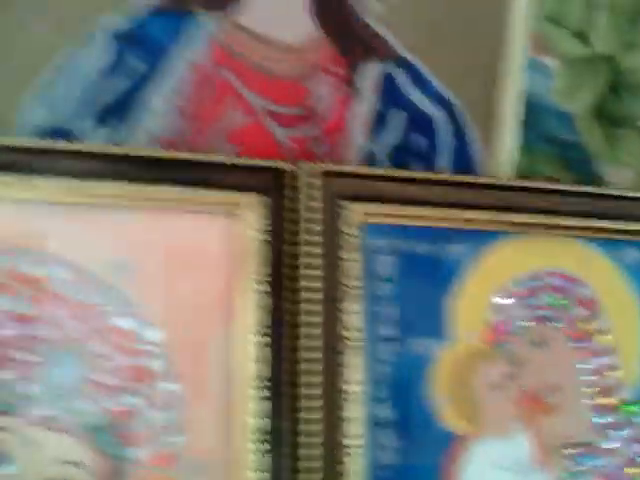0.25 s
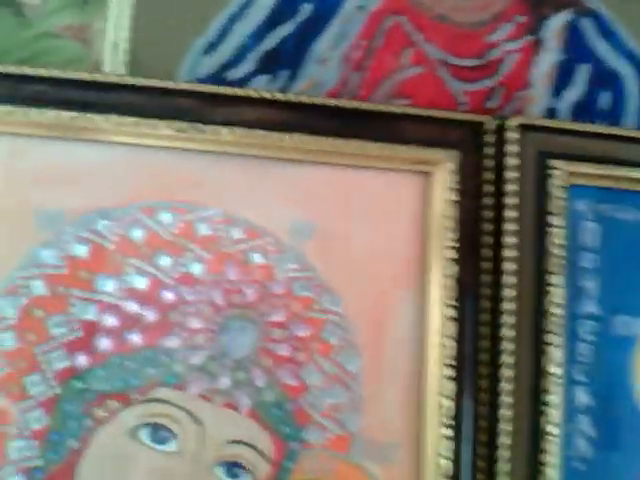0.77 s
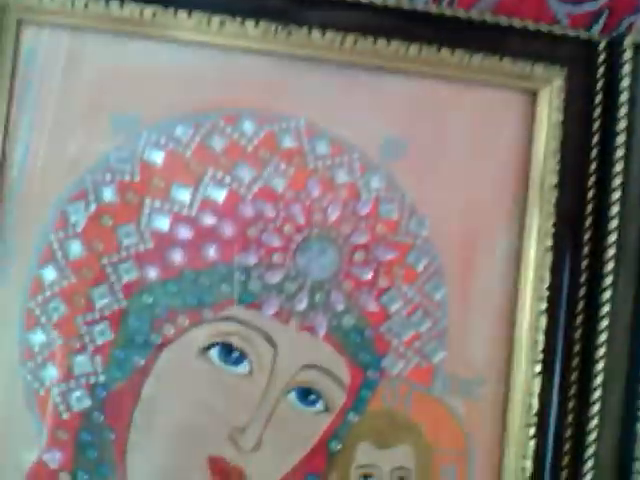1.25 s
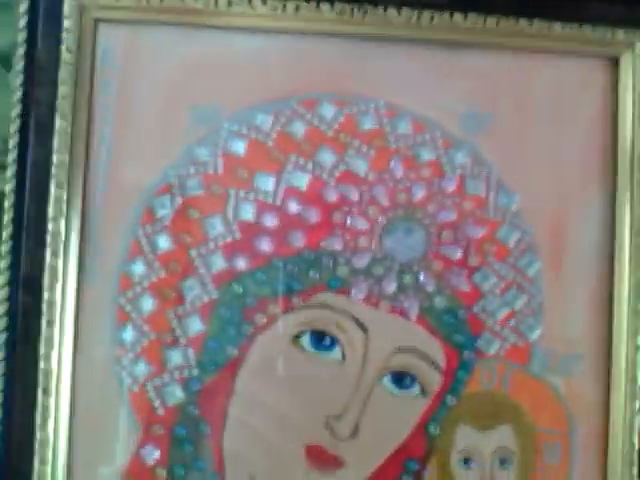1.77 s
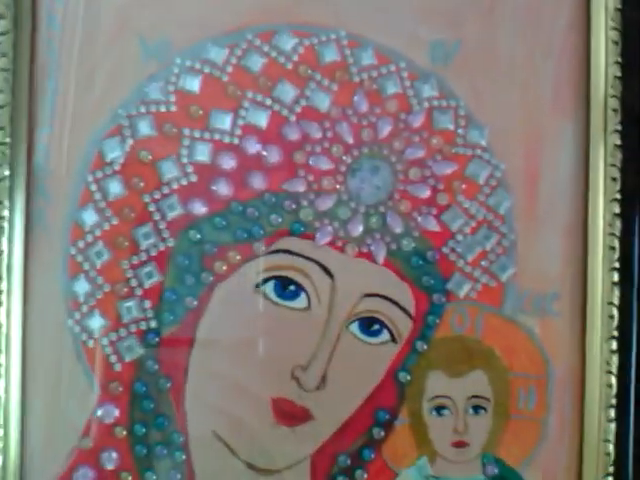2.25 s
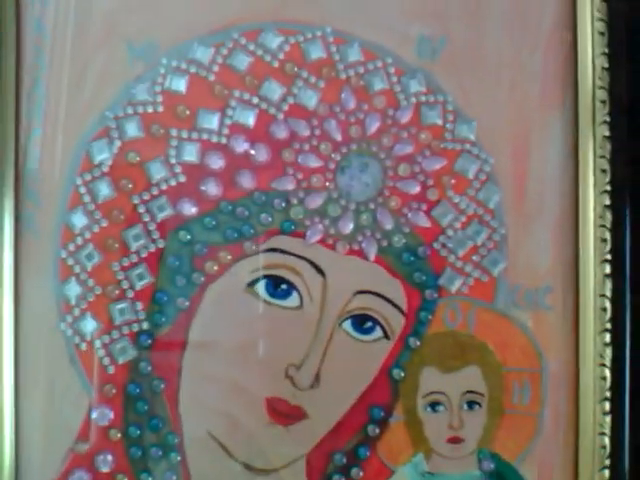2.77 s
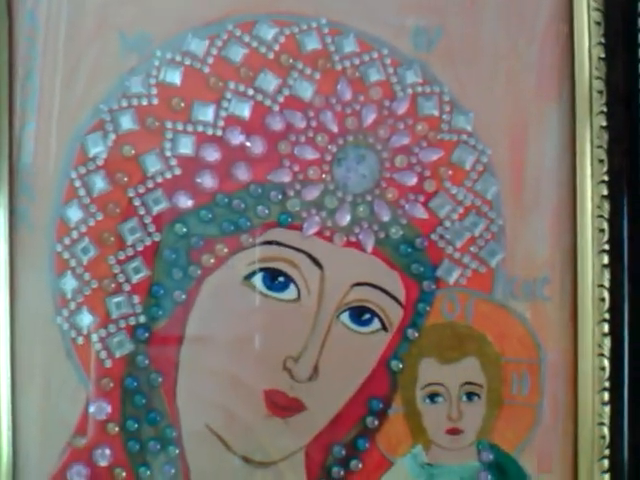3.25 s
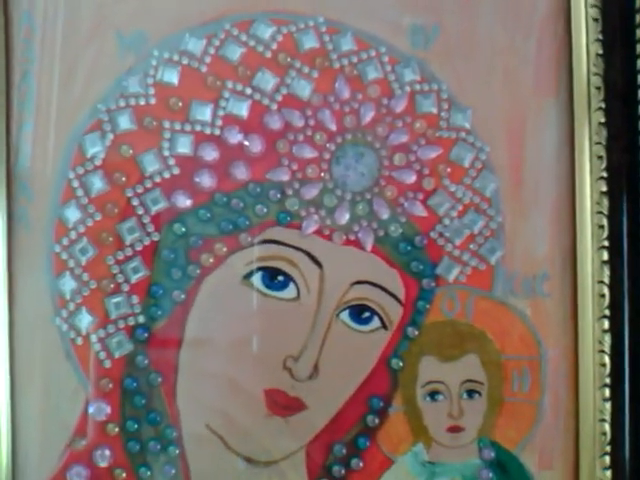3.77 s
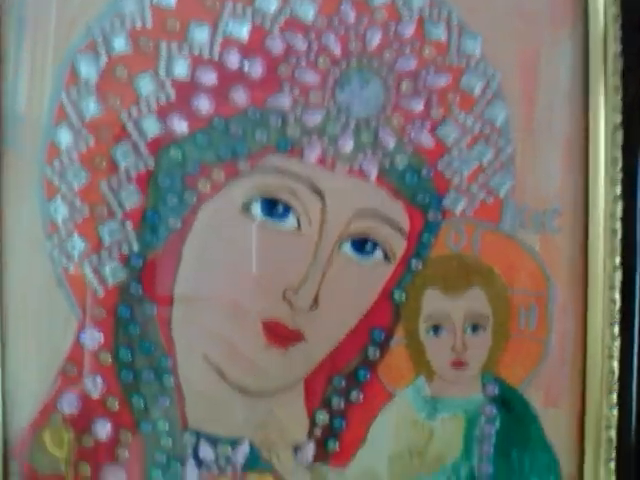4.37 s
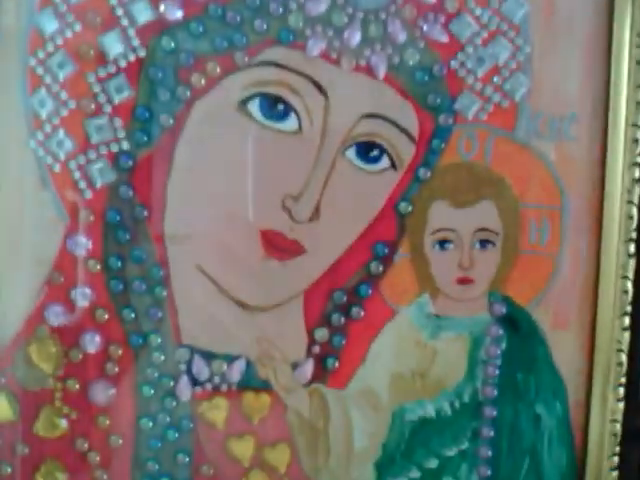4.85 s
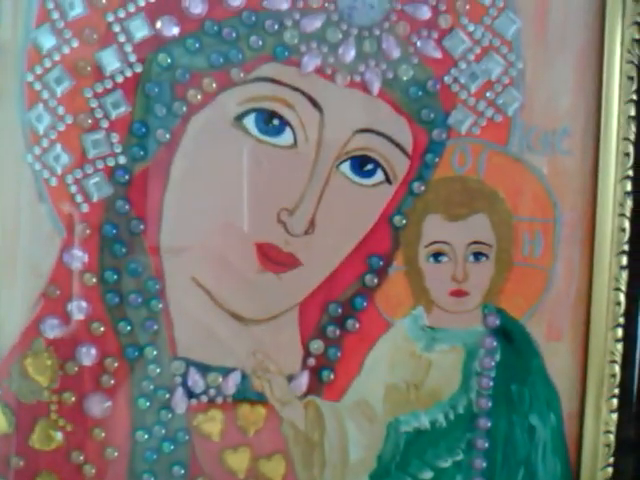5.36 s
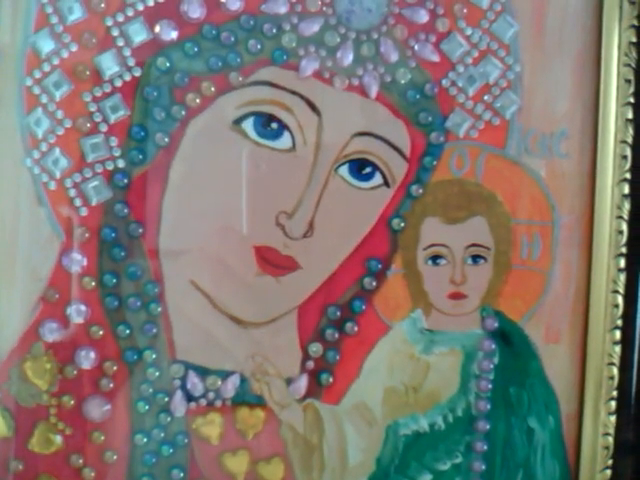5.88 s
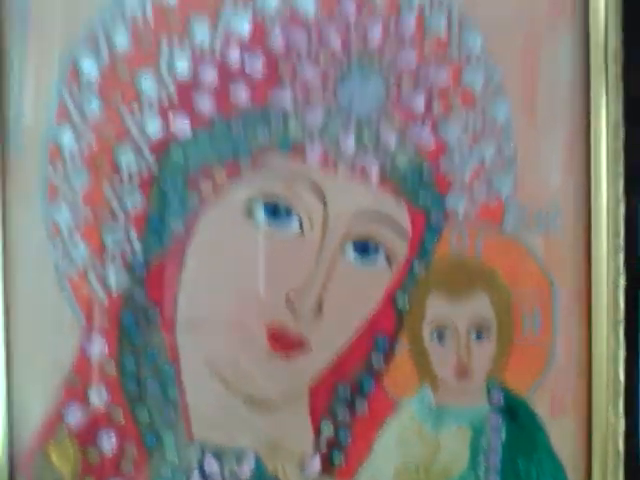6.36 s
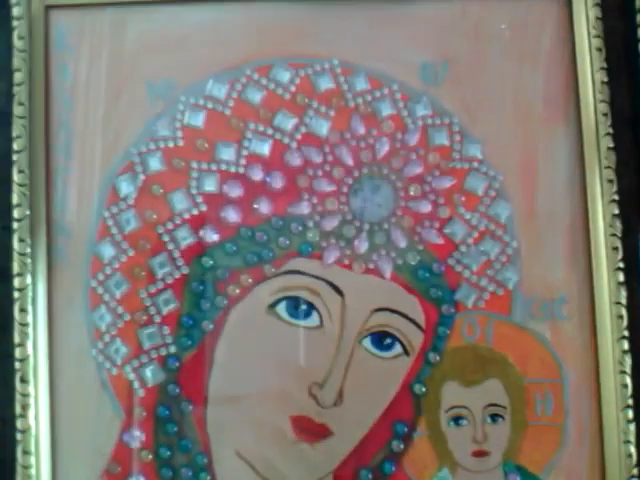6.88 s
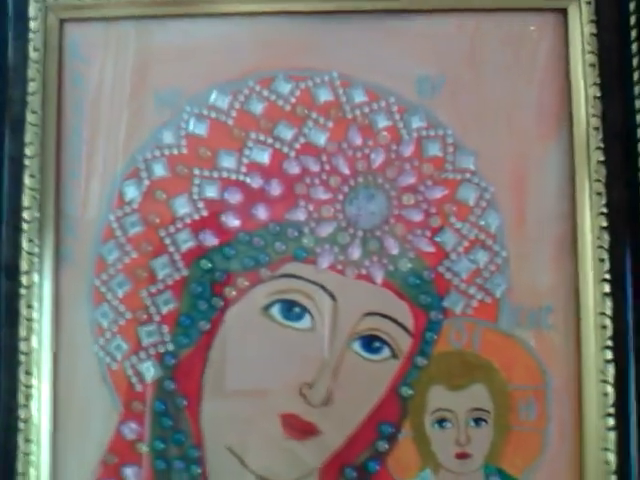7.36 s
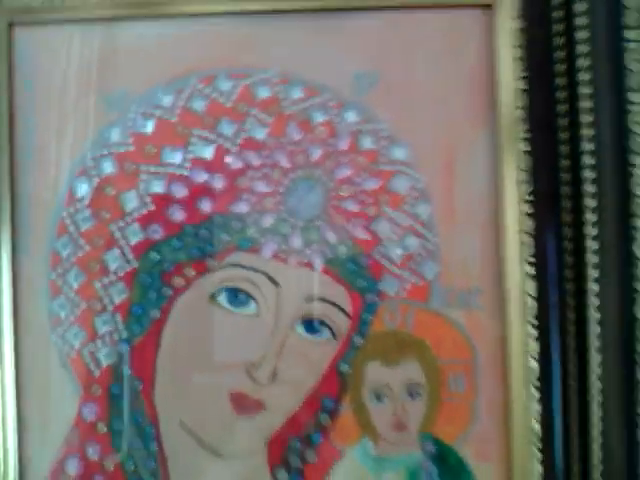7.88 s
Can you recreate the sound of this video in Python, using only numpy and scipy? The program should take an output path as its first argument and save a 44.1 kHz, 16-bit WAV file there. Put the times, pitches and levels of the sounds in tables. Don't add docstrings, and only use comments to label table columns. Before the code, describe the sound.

Steady throbbing fridge motor in a quiet room, broken by loud close plastic cracks, soft thumps and brief rustles of handling on the microphone.

```python
import sys
import numpy as np
from scipy import signal
from scipy.fft import rfft, irfft, next_fast_len
from scipy.io import wavfile
from scipy.ndimage import map_coordinates

SR = 44100
rng = np.random.default_rng(int(sys.argv[2]) if len(sys.argv) > 2 else 0)


def waveform_to_disk(signal):
    frames = np.transpose(np.atleast_2d(signal))
    scaled = np.clip(frames, -1, 1) * 32767
    samples = np.round(scaled).astype(np.int16)
    wavfile.write(sys.argv[1], SR, samples)


def volts_from_db(level):
    exponent = np.asarray(level, float) / 20
    return 10 ** exponent


N = 358091


def unit(x):
    return x / np.sqrt(np.mean(x ** 2) + 1e-20)


def along(points, hz):
    f, v = np.transpose(points)
    return np.interp(np.log(hz + 1), np.log(f + 1), v)


def wobble(rate_hz, count=N, sr=SR):
    knots = rng.standard_normal(int(count * rate_hz / sr) + 4)
    return map_coordinates(knots, [np.arange(count) * rate_hz / sr])


def filtered(x, response):
    m = next_fast_len(x.shape[-1] + 4096)
    spectrum = rfft(x, m) * response(np.fft.rfftfreq(m, 1 / SR))
    return irfft(spectrum, m)[..., :x.shape[-1]]


def noise(spectrum):
    return unit(filtered(rng.standard_normal(N), lambda hz: volts_from_db(along(spectrum, hz))))


def room():
    # freq_hz, density_db (per Hz)
    cabinet_spectrum = [(24, -36.5), (34, -44), (48, -34), (65, -8), (110, -9), (150, 4.5), (220, -0.5),
                        (280, -11), (355, -3.5), (410, -17.5), (465, -13.5), (520, -21), (700, -32.5),
                        (900, -120)]
    # freq_hz, density_db (per Hz)
    hiss_spectrum = [(260, -25), (450, -3.5), (556, -9.5), (722, -10), (1010, -9), (1770, -16.5),
                     (2380, -16.5), (2980, -21.5), (6840, -26), (7560, -30), (8770, -49.5), (11400, -79),
                     (19300, -120)]
    # time_s, level_db
    far_levels = [(0, -61), (1.8, -63), (2.2, -77.5), (4.8, -67), (5.2, -56), (5.899, -50), (6.2, -70),
                  (6.6, -60), (8.12, -62.5)]
    far_db = np.interp(np.arange(N) / SR, *np.transpose(far_levels))
    far = volts_from_db(far_db) * noise([(20, -28.5), (36, -22), (50, -8.5), (62, -2), (80, -19.5), (120, -120)])
    cabinet = volts_from_db(-44.5 + 0.45 * wobble(2.5)) * noise(cabinet_spectrum)
    hiss = volts_from_db(-58.5 + 0.43 * wobble(2.2)) * noise(hiss_spectrum)
    return cabinet + far + hiss


def motor():
    # order, level_db (rms), twin_1_db, twin_2_db, twin_3_db (1-3 slip steps higher), first_swell_s
    shaft_orders = [(1, -72.8, -94.6, -101.7, -89.1, 0.367), (2, -77.3, -96.0, -84.6, -82.2, 0.338),
                    (3, -51.7, -59.9, -80.4, -81.3, 0.201), (4, -35.8, -37.2, -62.2, -72.1, 0.205),
                    (5, -44.8, -48.5, -64.2, -74.0, 0.217), (6, -39.9, -45.7, -59.4, -71.7, 0.303),
                    (7, -45.5, -53.0, -56.7, -70.6, 0.309), (8, -49.7, -54.7, -58.4, -89.0, 0.305),
                    (9, -51.0, -53.0, -58.1, -70.0, 0.186), (10, -51.5, -57.8, -58.5, -64.5, 0.199),
                    (11, -64.0, -68.3, -67.5, -74.7, 0.164), (12, -63.8, -67.3, -76.9, -55.1, 0.328),
                    (13, -67.9, -58.9, -64.5, -57.7, 0.133), (14, -59.6, -56.7, -64.3, -56.7, 0.289),
                    (15, -70.0, -63.8, -79.1, -68.7, 0.106), (16, -61.0, -68.1, -80.8, -72.1, 0.301),
                    (17, -70.4, -78.3, -89.4, -78.2, 0.285)]
    shaft_hz, pull_hz = 24.3551, 99.9782
    stroke_s, stroke_turns = 0.0062, -0.327
    wall_s, wall_share = 0.0238, 0.9
    coarse = 16
    t = np.arange(-coarse, N // coarse + coarse) * coarse / SR
    slip_hz = pull_hz - 4 * shaft_hz
    hum = np.zeros(len(t))
    for order, *levels_db, swell_s in shaft_orders:
        hz = order * shaft_hz
        wall_phase = np.angle(1 + wall_share * np.exp(-1j * 2 * np.pi * hz * wall_s))
        stroke = np.exp(1j * (2 * np.pi * (hz * (t - stroke_s) + stroke_turns) + wall_phase))
        slip = np.exp(1j * 2 * np.pi * slip_hz * (t - swell_s))
        throb = np.polyval(volts_from_db(levels_db[::-1]), slip)
        drift = volts_from_db(0.25 * wobble(1.2, count=len(t), sr=SR / coarse))
        hum += np.sqrt(2) * (stroke * throb).real * drift
    return signal.resample_poly(hum, coarse, 1, window=("kaiser", 12))[coarse ** 2:][:N]


def case(hz):
    # freq_hz, width_hz, level_db
    resonances = [(596, 153, -1.5), (1204, 207, 0), (1538, 370, 0), (2240, 616, -2), (2900, 770, -5.5),
                  (4200, 1500, -6), (5410, 2700, -10), (7010, 1700, -15)]
    total = 0
    for k, (centre_hz, width_hz, db) in enumerate(resonances):
        damping = 1j * hz * width_hz
        total = total + (-1) ** k * volts_from_db(db) * damping / (centre_hz ** 2 - hz ** 2 + damping)
    return total


def bands(x):
    # low_hz, high_hz
    limits = [(0, 950), (950, 1750), (1750, 2800), (2800, 9500)]

    def below(hz, edge_hz):
        return 1 / (1 + (hz / (edge_hz + 1e-9)) ** 8)

    def response(hz):
        return case(hz) * np.array([below(hz, high) - below(hz, low) for low, high in limits])

    return filtered(x, response)


def colour(db, bright_db, focus_db):
    step = np.arange(4) - 3 / 2
    return volts_from_db(db + bright_db * step - focus_db * (np.abs(step) > 1))


def fingers():
    # start_s, length_s, level_db, bright_db (per band),
    # focus_db
    slides = [(0.01, .11, -60, -1, -3.5), (0.145, 0.97, -69.5, -2, -3.5), (0.726, 0.016, -57.5, -0.5, -1),
              (0.775, .07, -68.5, -5.5, 6), (0.863, 0.016, -49.5, -1.5, -2), (0.908, 0.11, -57.5, -0.5, -3),
              (1.029, 0.019, -46.5, 1, -4), (1.085, 0.016, -48.5, 0, -4.5), (1.176, 0.03, -53, -2, -4.5),
              (1.237, .05, -53.5, -0.5, -3), (1.3, 0.056, -37, 0, -4), (1.363, .12, -39.5, 0.5, 0),
              (1.504, 0.051, -37, 2, 0), (1.576, 0.087, -38, 0, -0.5), (1.679, 0.077, -39.5, -2, 0.5),
              (1.811, .1, -39.5, -1, -1.5), (1.929, 0.073, -52, -2.5, -2), (2.027, 0.034, -51.5, -3, -1.5),
              (2.108, .14, -58, -5, 0), (2.28, 0.14, -56.5, -4, -0.5), (2.38, 0.058, -58, -2, -1),
              (3.076, .01, -56.5, -1.5, -1), (3.95, 0.43, -72.5, -4, 1), (4.36, 0.0081, -56.5, -4, -7.5),
              (4.405, 0.11, -55, -1, -2), (4.537, .1, -63, -4, -3), (4.664, 0.16, -67.5, -4.5, -5),
              (6.441, .04, -54, -2.5, 1), (6.484, 0.043, -46.5, 1.5, 6), (6.545, 0.053, -52.5, 0.5, 4.5),
              (6.63, 0.11, -64, 1.5, 2), (6.83, 0.08, -65.5, 1, 0), (6.993, 0.0056, -64.5, 1, 1),
              (7.594, 0.13, -66.5, 1, 4), (7.75, .17, -57.5, 2, 9), (7.943, 0.0055, -39, -4, -1.5),
              (7.972, 0.03, -49.5, -5, 2.5), (8.012, .1, -56, -0.5, 0)]
    # level_db, bright_db (per band), focus_db
    still_hand = (-73.5, -2.5, 0)
    grip_db_per_s, lift_db_per_s = 701, 398
    jerks = rng.standard_normal(N) * volts_from_db(1.5 * wobble(60) + 0.87 * wobble(400))
    t = np.arange(0, N / SR, 1 / 1000)
    power = colour(*still_hand)[:, None] ** 2
    for start_s, length_s, *tone in slides:
        grip_db = grip_db_per_s * np.maximum(start_s - t, 0)
        lift_db = lift_db_per_s * np.maximum(t - start_s - length_s, 0)
        power = power + np.outer(colour(*tone), volts_from_db(-grip_db - lift_db)) ** 2
    out = np.zeros(N)
    for part, gain in zip(bands(jerks), np.sqrt(power)):
        unsteady = volts_from_db(0.74 * wobble(30) + 0.84 * wobble(11))
        out += unit(part) * np.interp(np.arange(N) / SR, t, gain) * unsteady
    return out


def bumps():
    # peak_s (strongest swing), peak_db, swing_hz, length_s
    rocks = [(.117, -36, 170, 0.013), (0.485, -19.5, 162, 0.029), (.698, -27, 160, 0.025),
             (0.743, -14, 149, 0.018), (.865, -30, 176, 0.042), (1.286, -18.5, 213, 0.0095),
             (1.308, -16, 160, 0.017), (1.354, -18, 129, 0.013), (1.758, -14.5, 182, 0.014),
             (1.819, -10, 330, 0.0027), (2.8, -37, 166, 0.02), (4.29, -25, 173, 0.018),
             (4.312, -27, 160, 0.024), (6.422, -29.5, 200, 0.022), (6.449, -17.5, 112, 0.013),
             (6.46, -41, 55, .05), (1.295, -44, 55.3, 0.075), (6.417, -26, 450, 0.0048),
             (7.878, -29.5, 121, 0.029), (7.934, -13, 383, 0.012), (7.955, -23.5, 256, 0.011),
             (8.022, -28, 150, 0.015)]
    before = SR // 10
    out, t = np.zeros(N + SR), np.arange(-before, before) / SR
    for peak_s, db, hz, length_s in rocks:
        width_s = np.where(t < 0, 0.25, 0.4) * length_s
        swing = np.exp(-(t / width_s) ** 2 / 2) * np.sin(2 * np.pi * hz * t)
        out[round(peak_s * SR) - before:][:len(t)] += volts_from_db(db) * swing
    return out[:N]


def clicks():
    # start_s, level_db (rms over 12 ms), bright_db (per band), focus_db
    ticks = [(0.0304, -71, -9, -6), (0.1096, -55.5, -4.5, -3.5), (0.6835, -37.5, -3.5, -2),
             (1.3034, -32, 1, -3), (1.3463, -30.5, -1, 6), (1.8178, -36.5, -7, 5.5),
             (2.2404, -81, -1, -7.5), (2.2912, -50.5, -8.5, 5.5), (2.6045, -47.5, 0.5, 3.5),
             (2.733, -56.5, -6, 4), (2.7656, -54, -6.5, 5), (2.789, -61, -13, 0), (2.812, -57.5, -13.5, 3),
             (3.0621, -36, -2.5, 1.5), (4.2245, -51, -16, 24), (4.3027, -48.5, 0, -3.5),
             (4.5407, -57, 0, -4.5), (4.714, -48.5, 2, 13), (6.4117, -39.5, 0.5, 0.5),
             (6.4431, -44, 6.5, 10), (6.4607, -51.5, 6, 2), (7.648, -53.5, -9, 12), (7.7169, -59, 2, 5)]
    # start_s, level_db (rms over 12 ms), bright_db (per band), focus_db
    creaks = [(0.4738, -60.5, -4, -4.5), (0.847, -39.5, -3, 1), (0.8614, -44, -2.5, -2),
              (0.9213, -53, 0, 2), (1.0798, -44, -9, 20), (1.1618, -54, -1, -4), (1.2934, -29.5, -1.5, 6.5),
              (2.1344, -60, 0, 4), (3.044, -36.5, -0.5, 4), (4.0567, -43, 0, 5), (4.351, -53, -0.5, -4.5),
              (4.6613, -52.5, 2, -1.5), (4.78, -53.5, -0.5, 9), (6.488, -53, 1.5, -3),
              (6.6408, -53.5, -2, -0.5), (7.859, -60, -10, 3)]
    out, t = np.zeros(N + SR), np.arange(SR // 10) / SR
    for events, t60_s in ((ticks, 0.024), (creaks, 0.038)):
        envelope = volts_from_db(-60 * t / t60_s) * (1 - np.exp(-t / (0.02 * t60_s)))
        for start_s, *tone in events:
            parts = bands(rng.standard_normal(len(t)) * envelope)
            parts = parts / np.sqrt(np.sum(parts ** 2, axis=1, keepdims=True) / (0.012 * SR))
            out[round(start_s * SR):][:len(t)] += colour(*tone) @ parts
    return out[:N]


def snaps():
    # start_s, peak_db, rise_s, crack_db (share)
    seams = [
        (1.279, 1, 0.0003, -2.5),
        (1.7504, 4.5, 0.00076, 1),
        (4.2851, -4, 0.00066, -11.5),
        (7.9261, 1.5, 0.002, -13),
    ]
    # freq_hz, level_db, t60_s
    seam_modes = [
        [(623, -6.5, 0.016), (1280, -0.5, 0.0061), (1950, -2, 0.0061), (2710, -11.5, 0.0041),
         (4260, -3, 0.0038), (5730, -18, 0.0051)],
        [(647, -4, 0.015), (1170, -9.5, .01), (1545, 0.5, 0.0092), (1967, 2.5, 0.0065), (2930, -6, 0.0048),
         (3436, -5.5, 0.0062), (4100, -3, 0.002), (5250, 0.5, 0.0055), (7140, -3, 0.0032)],
        [(638, -2.5, 0.013), (1483, 0.5, 0.0064), (2006, 5, 0.0049), (2370, -8.5, 0.008), (2930, -14.5, 0.0077),
         (3970, -21, 0.0067)],
        [(458, -8.5, 0.027), (636, -15.5, 0.021), (782, -9, 0.023), (1150, -2.5, 0.02), (1550, -4.5, 0.018),
         (1717, -6, 0.02), (2307, 0.5, 0.013), (2920, -17, 0.016), (3525, -12, 0.011)],
    ]
    out, t = np.zeros(N + SR), np.arange(SR // 10) / SR
    for (start_s, db, rise_s, crack_db), modes in zip(seams, seam_modes):

        def swell(hz):
            return (1 - np.exp(-t / (0.63 * rise_s + 0.3 / hz))) ** 3

        ring = np.zeros(len(t))
        for hz, level_db, t60_s in modes:
            tone = np.sin(2 * np.pi * (hz * t + rng.random()))
            ring += volts_from_db(level_db - 60 * t / t60_s) * swell(hz) * tone
        grain = unit(filtered(rng.standard_normal(len(t)), case))
        crack = volts_from_db(crack_db - 60 * t / (8 * rise_s)) * swell(3000) * grain
        snap = ring + crack
        out[round(start_s * SR):][:len(t)] += volts_from_db(db) * snap / np.abs(snap).max()
    return out[:N]


def scene():
    # freq_hz, gain_db
    mic_response = [(20, 1.5), (6800, -3), (7800, -8.5), (8600, -10), (9100, -43), (9600, -120)]
    touch = filtered(fingers() + clicks() + snaps(), lambda hz: volts_from_db(along(mic_response, hz)))
    return (motor() + room() + touch + bumps())[None]


def low_pass(x):
    return signal.sosfilt(signal.butter(12, 8920, fs=SR, output="sos"), x)


def record(dry):
    held = dry / (1 + np.abs(dry / 0.93) ** 8) ** (1 / 8)
    held = filtered(held, lambda hz: 1 / (1 + (hz / 8800) ** 40))
    return low_pass(held)


dry = scene()
out = record(dry)
waveform_to_disk(out)
```